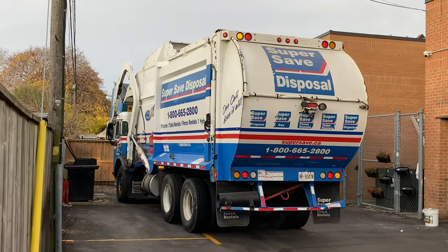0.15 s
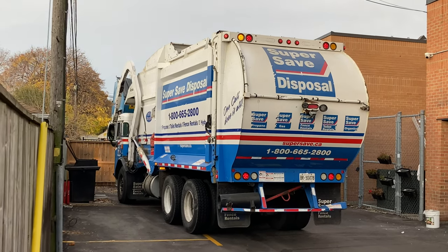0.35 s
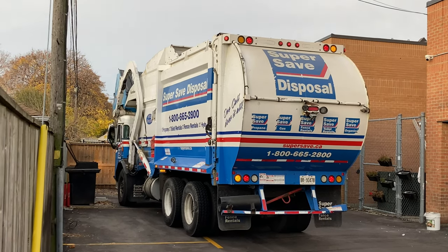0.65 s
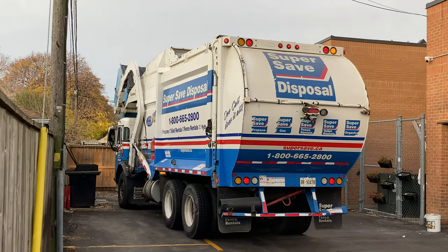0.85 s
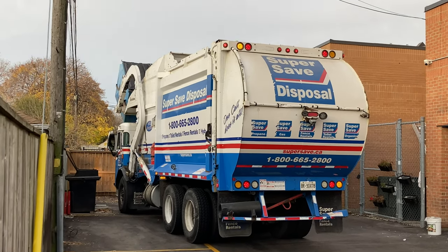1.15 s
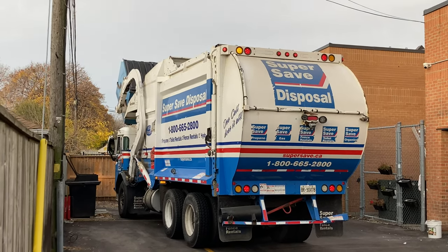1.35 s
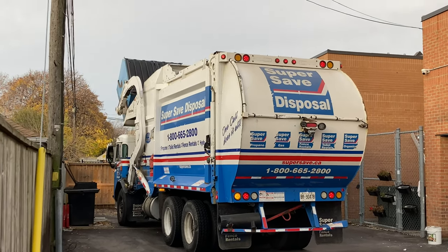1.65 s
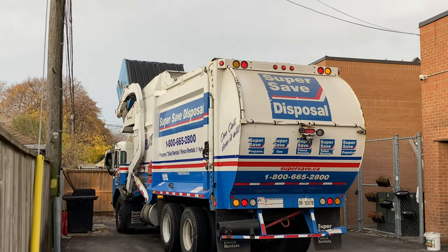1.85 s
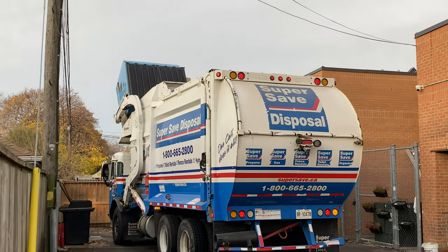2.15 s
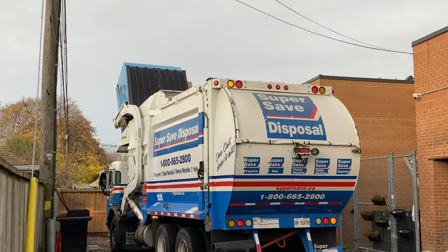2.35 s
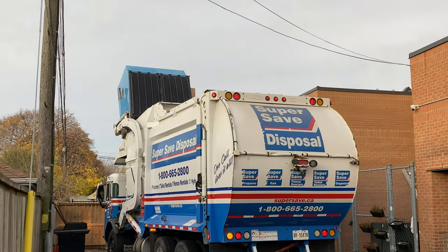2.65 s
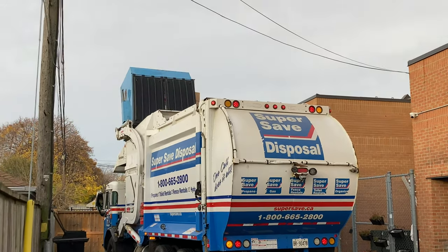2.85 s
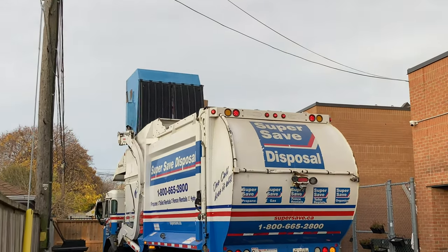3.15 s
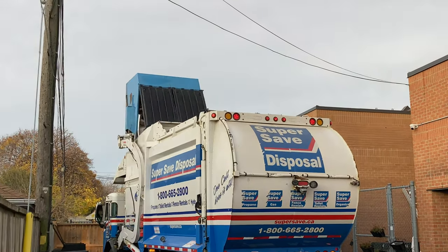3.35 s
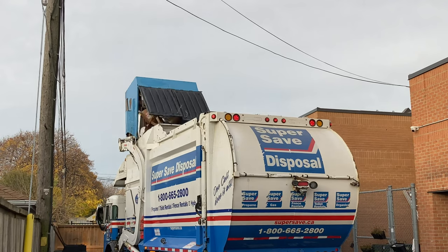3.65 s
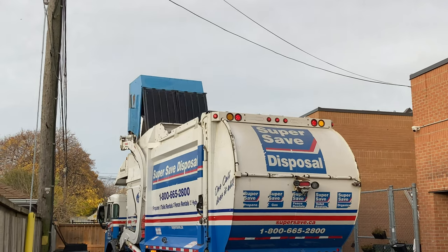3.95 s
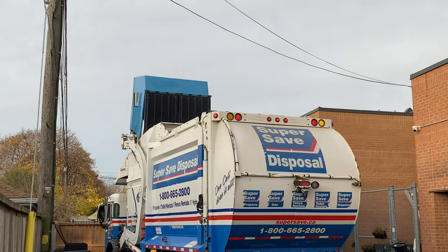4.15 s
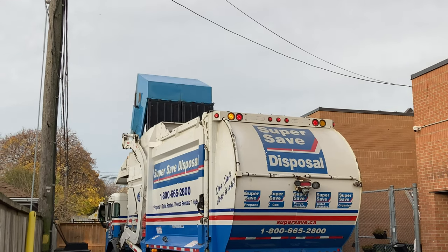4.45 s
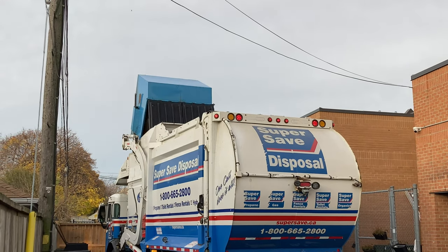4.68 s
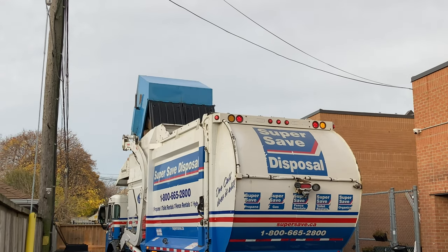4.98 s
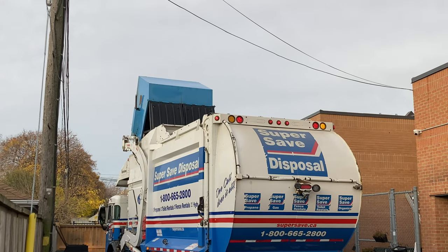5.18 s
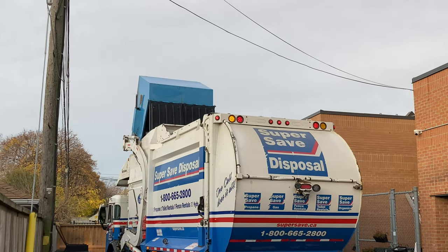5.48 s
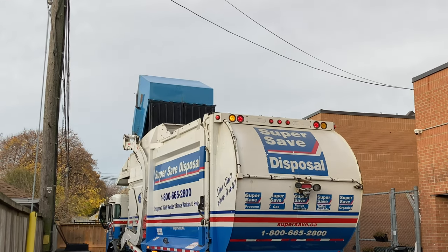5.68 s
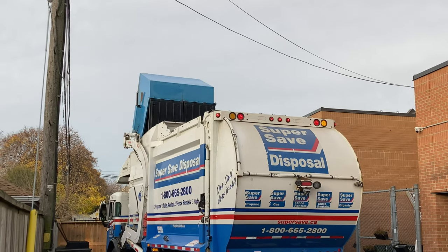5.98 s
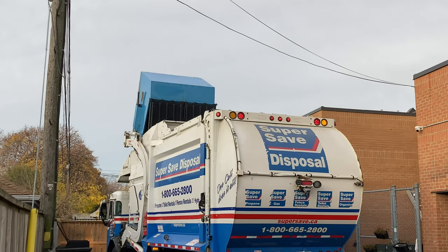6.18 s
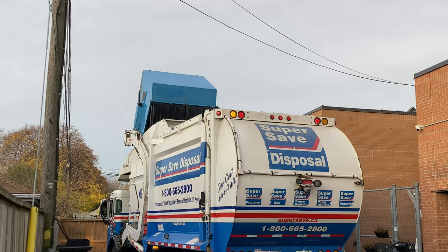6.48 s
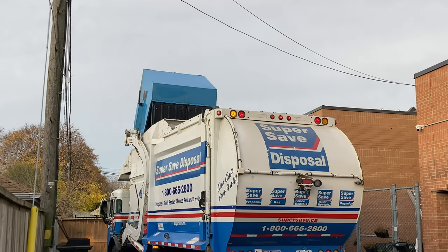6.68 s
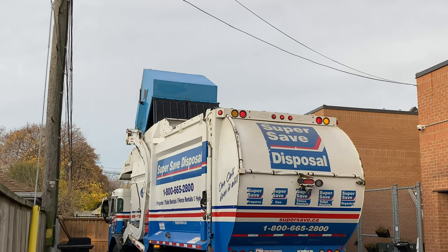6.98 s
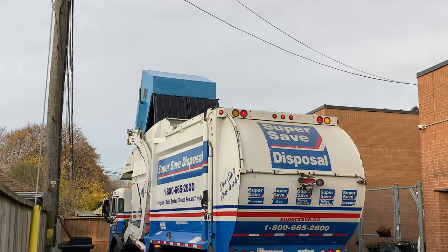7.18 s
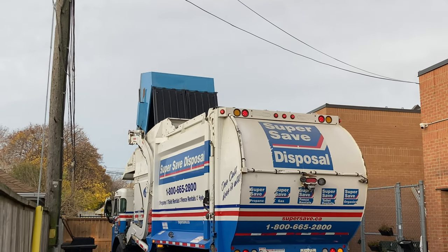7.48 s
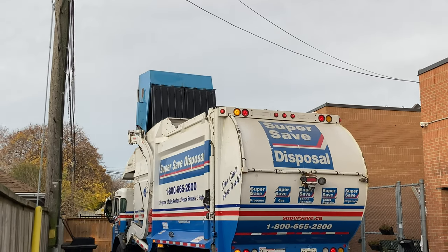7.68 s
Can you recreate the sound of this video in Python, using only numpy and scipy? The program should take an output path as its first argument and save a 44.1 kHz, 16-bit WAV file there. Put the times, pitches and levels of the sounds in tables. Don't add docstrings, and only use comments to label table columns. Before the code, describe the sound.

Outdoors, a refuse truck roars and whines while lifting a metal bin, hisses, drops to idle, and bangs the bin three times with rumbling echoes.

```python
import sys
import numpy as np
from scipy import signal
from scipy.fft import rfft, irfft, next_fast_len
from scipy.io import wavfile
from scipy.ndimage import uniform_filter1d

SR = 44100
rng = np.random.default_rng(int(sys.argv[2]) if len(sys.argv) > 2 else 0)


def store_pcm(level_fs):
    pcm = np.round(np.clip(level_fs, -1, 1) * 32767).astype(np.int16)
    wavfile.write(sys.argv[1], SR, np.atleast_2d(pcm).T)


N = 345303
SIZE = next_fast_len(N)
HZ = np.maximum(np.arange(SIZE // 2 + 1) * SR / SIZE, 1)
RELEASE_S, RELEASE_FADE_S = 2.975, 0.038


def from_db(db):
    return 10 ** (np.asarray(db) / 20)


def rms_one(x):
    return x / np.sqrt(np.mean(x ** 2) + 1e-20)


def ramp(start, length):
    return np.clip((np.arange(N) / SR - start) / length, 0, 1)


def in_time(rows, silent_db=None):
    s, *columns = np.transpose(rows)
    return [np.interp(np.arange(N) / SR, s, c, silent_db, silent_db) for c in columns]


def at_hz(points, outside=None):
    hz, value = np.transpose(points)
    return np.interp(np.log(HZ), np.log(np.maximum(hz, 1)), value, outside, outside)


def drift(rate):
    r = np.exp(-80 * np.pi * rate / SR)
    slow = signal.lfilter([1], [1, -2 * r, r * r], rng.standard_normal(N // 40 + 2002))[2000:]
    return np.interp(np.arange(N) / 40, np.arange(len(slow)), rms_one(slow))


def phase_of(hz):
    return 2 * np.pi * np.cumsum(hz) / SR


# (frequency [Hz], likeness [0-1])
LIKENESS = [(60, .985), (200, .975), (380, .82), (700, .68), (1400, .25), (2800, .4), (5200, .42),
            (6500, .5), (7500, .88), (9000, .95), (15000, .94)]


def field(gain):
    common, opposed = rfft(rng.standard_normal((2, SIZE))) * gain
    alike = np.clip(at_hz(LIKENESS), 0, 1)
    both = np.sqrt(1 + alike) * common + np.sqrt(1 - alike) * opposed * [[1], [-1]]
    return rms_one(irfft(both, SIZE)[:, :N])


def coloured(spectrum):
    return field(from_db(at_hz(spectrum, -102.5)))


# (time [s], pump pulse rate [Hz])
SPEED = [(0, 281), (.07, 292), (.15, 310), (.3, 329), (.45, 341), (.6, 349), (.8, 352), (.95, 352),
         (1.05, 349), (1.2, 342), (1.35, 337), (1.5, 334), (1.8, 331.5), (3.0, 331), (3.1, 326)]
# (time [s], firing rate [Hz])
IDLE_FIRING = [(3.1, 47), (3.6, 63), (7.83, 54)]


def firing_phase():
    pump_per_firing = 4.74
    laden = [(s, hz / pump_per_firing) for s, hz in SPEED[:-1]]
    firing = in_time(laden + list(IDLE_FIRING))[0]
    return phase_of(firing * (1 + 0.022 * drift(7.7)))


# (frequency [Hz], density [dB per Hz])
HISS = [(2300, 2.5), (2800, -2.5), (4500, -4), (6000, -9), (8500, -4.5), (11000, 0), (13500, -8),
        (15800, -9)]


def air_hiss(turn):
    return coloured(HISS) * (1 + .2 * np.cos(turn / 3)) * from_db(.5 * drift(3))


# (frequency [Hz], density [dB per Hz])
BLOCK = [(220, -27), (380, -11.5), (568, -4), (664, -2), (877, -8), (1090, -7), (1190, -12.5),
         (1440, -12.5), (1960, -17), (2250, -15), (2700, -23), (3510, -97), (5940, -120)]


def block_rattle(turn):
    return coloured(BLOCK) * (1 + 0.13 * np.cos(turn)) * from_db(0.88 * drift(23))


# (frequency [Hz], width [Hz], level [dB])
PANELS = [(151.2, 24, -25.5), (180.1, 6, -22.5), (238, 7.8, -26.5), (303, 6, -36.5)]


def body_panels():
    resonances = sum(from_db(db) / (1 + 2j * (HZ - hz) / width) for hz, width, db in PANELS)
    shaken = from_db(-1.0) * field(resonances)
    drum_db = -4.5 + 6.4 * drift(6.6) - 30 * ramp(RELEASE_S, RELEASE_FADE_S)
    drum = np.sin(phase_of(200.5 * (1 + 0.0092 * drift(4.0))))
    return shaken, from_db(drum_db) * drum


# (frequency [Hz], density [dB per Hz])
ROAR = [(19, -59.5), (32, -38.5), (46, -30), (60, -3), (76, -0.5), (107, -12), (140, -4.5), (189, -3),
        (285, -8), (339, -11.5), (385, -58), (420, -20.5), (550, -16), (920, -120)]


def exhaust_roar(turn, winding_down):
    puffs = coloured(ROAR) * (1 + 0.35 * np.cos(turn)) * from_db(0.27 * drift(1.7))
    tone_db = -24.0 - 9.0 * winding_down + 2.1 * drift(3.0)
    return puffs + from_db(tone_db) * np.sin(turn)


# (time [s], level [dB])
EFFORT = [(0, -16.5), (.05, -14), (.31, -13), (.66, -11), (1.15, -11.5), (2.5, -13), (2.88, -11.5),
          (3.0, -19.5), (3.15, -13), (3.4, -32), (3.6, -28), (4.2, -21), (5.3, -39.5), (5.8, -34),
          (6.3, -34), (7.2, -35.5), (7.83, -32.5)]


def engine():
    roar_db, = in_time(EFFORT)
    swing = roar_db + 14
    winding_down = ramp(3.45, 1.84)
    block_db = -25 + 0.27 * swing - 11.5 * winding_down
    hiss_db = -33 + 0.92 * swing - 3 * ramp(5.1, .3) + 5 * ramp(TICK[0][0], 0.029)
    turn = firing_phase()
    shaken, drum = body_panels()
    roar = exhaust_roar(turn, winding_down) + shaken + drum
    block = from_db(block_db + 1.0) * block_rattle(turn)
    return from_db(roar_db - 3.5) * roar + block + from_db(hiss_db) * air_hiss(turn)


# (time [s], frequency [Hz], level [dB])
MESH = [(0, 1065, -55), (.17, 995, -32), (.24, 1040, -38), (.33, 1075, -32.5), (.42, 1100, -34),
        (.45, 1112, -28.5), (.56, 1128, -34), (.62, 1138, -35.5), (1.07, 1135, -42), (1.12, 1124, -33),
        (1.31, 1104, -26), (1.37, 1100, -35), (1.87, 1083, -41), (1.92, 1082, -30), (2.46, 1081, -29),
        (2.53, 1081, -44), (2.6, 1081, -33.5), (2.98, 1080, -26)]
# (time [s], level [dB])
PRESSURE = [(0, -38), (.3, -33), (.6, -30), (.75, -31.5), (.95, -35), (1.08, -24), (1.25, -32), (1.4, -38),
            (1.52, -29), (1.75, -26), (2.08, -26.5), (2.17, -31), (2.3, -33), (2.45, -34), (2.7, -31),
            (3.0, -27)]
# (time [s], level [dB])
PUMP = [(0, -31), (.12, -22.5), (.25, -35), (.55, -23.5), (.8, -33.5), (1.08, -27), (1.35, -31), (1.6, -34),
        (2.2, -36), (2.4, -30.5), (3.0, -30)]
# (time [s], level [dB])
HIGH_GEAR = [(0, -43), (.08, -38), (.2, -47), (.33, -40), (.42, -45), (.52, -45), (.68, -33.5),
             (.78, -36.5), (.86, -50), (.98, -42), (1.06, -31.5), (1.13, -49), (2.2, -50), (2.4, -41.5),
             (2.62, -44), (2.7, -48), (3.0, -50)]


def whines():
    turn = phase_of(in_time(SPEED)[0] * (1 + .002 * drift(14)))
    mesh_hz, mesh_db = in_time(MESH)
    mesh = phase_of(mesh_hz * (1 + .0015 * drift(14)))
    high = 6.81 * turn
    high_db, = in_time(HIGH_GEAR)
    octave_db = high_db - 18 + 15 * ramp(1.03, 0.09)
    tones = [(turn, in_time(PUMP)[0], 3.5, 0),
             (2 * turn, in_time(PRESSURE)[0], 2.5, 0),
             (mesh, mesh_db, 1.0, 0.53),
             (high, high_db, 2.5, 0),
             (2 * high, octave_db, 3, -1.0),
             (2 * mesh, mesh_db - 14.5, 3.0, 0),
             (4 * mesh, mesh_db - 19.0, 3.0, 0)]
    out = np.zeros((2, N))
    for phase, level_db, waver_db, lead in tones:
        waver = drift(16) + np.array([drift(14), drift(14)]) / 2
        out += from_db(level_db + 3 + waver_db * waver) * np.sin(phase + lead * np.array([[1], [-1]]))
    released = ramp(RELEASE_S, RELEASE_FADE_S)
    return out * from_db(-36 * released) * (released < 1)


# (time [s], level [dB])
VALVE = [
    (2.935, -34),
    (2.951, -12.5),
    (2.963, -7),
    (3.073, -22.5),
    (3.14, -29),
]
# (frequency [Hz], density [dB per Hz])
JET = [(1200, -25), (1800, -9), (2300, -1.5), (3000, -10), (4200, -3), (5500, -4), (7500, -4.5),
       (10000, 1.5), (13000, -5.5), (15800, -6)]


def valve():
    return from_db(in_time(VALVE, -120)[0] + 1.8 * drift(60)) * coloured(JET)


# (time [s], frequency [Hz], level [dB])
HINGE = [(3.2, 2150, -60), (3.24, 2200, -33), (3.3, 2120, -37), (3.36, 2230, -35), (3.42, 2200, -34),
         (3.48, 2250, -32), (3.53, 2200, -60)]


def hinge():
    hz, level_db = in_time(HINGE)
    turn = phase_of(hz * (1 + .02 * drift(30)))
    sounding = ramp(HINGE[0][0], .01) - ramp(HINGE[-1][0], .01)
    return sounding * from_db(level_db + 4 * np.array([drift(40), drift(40)])) * np.sin(turn)


# (time [s], light refuse level [dB], heavy pieces level [dB])
SLIDE = [(3.19, -20, -17), (3.376, -22.5, -17.5), (3.41, -25.5, -25), (3.5, -29.5, -32), (3.9, -30.5, -21),
         (3.97, -29, -25.5), (4.02, -36.5, -30), (4.13, -45, -29), (4.25, -43, -22)]
# (frequency [Hz], density [dB per Hz])
RUSTLE = [(2600, -4), (3500, -5), (5000, -4), (7000, -0.5), (8500, -1), (10000, -3)]


def load():
    rustle_db, tumble_db = in_time(SLIDE, -120)
    fizz_db = rustle_db - 0.5 - 9 * ramp(3.4, 0.16)
    scrape_db = -1.5 + 0.23 * rustle_db + 0.77 * tumble_db
    clumps = from_db(1.3 * drift(22))
    fizz = coloured([(8500, -25), (9500, 6), (12800, -3.0), (13400, -3)])
    scrape = field(1 / (1 + (2 * (HZ - 2120) / 600) ** 2))
    tumble = field(1 / (1 + (2 * (HZ - 400) / 450) ** 2)) * from_db(2.8 * drift(9.5))
    bright = from_db(rustle_db) * coloured(RUSTLE)
    bright = bright + from_db(fizz_db) * fizz + from_db(scrape_db - 7.0) * scrape
    return clumps * bright + from_db(tumble_db - 8.5) * tumble


# (time [s], boom [dB], clang [dB], bright crack [dB], sizzle of shaken grit [dB])
SLAMS = [
    (3.161, -24.5, -25.5, -9, -43),
    (4.253, -20.5, -24.5, -19, -21.5),
    (6.363, -18.5, -27.5, -38, -34),
]
# (time [s], boom [dB], clang [dB], length [s])
GRINDS = [
    (4.154, -33.5, -30.5, 0.21),
    (4.296, -20, -19.5, 0.13),
    (6.366, -25.5, -28.5, 0.062),
    (6.476, -29, -28.5, 0.17),
]
# (time [s], boom [dB], dry knock [dB],
# knock pitch [Hz])
KNOCKS = [(3.12, -23.5, -18, 365), (3.169, -33, -8, 480), (3.186, -38, -29, 400), (3.19, -43, -25, 3500),
          (3.236, -45, -17, 1500), (3.3, -25.5, -23, 900), (3.372, -35, -28, 340),
          (3.168, -48, -11.5, 2960), (3.175, -26.5, -16, 560), (3.18, -45, -28, 1000),
          (3.212, -53, -20, 700), (3.26, -45, -19.5, 915), (3.243, -38, -20, 2200),
          (4.019, -33.5, -15, 265), (4.266, -21, -10.5, 297), (4.359, -28, -19, 500),
          (4.409, -25.5, -14, 450), (4.405, -32, -17, 2290), (4.431, -41, -21, 2870),
          (4.32, -49, -35, 5500), (4.37, -47, -28, 4000), (4.113, -49, -26, 516), (4.145, -35.5, -40, 410),
          (4.279, -43, -16, 890), (4.331, -37, -19, 356), (4.381, -41, -11.5, 290),
          (4.466, -49, -24, 1210), (4.482, -42, -17, 298), (4.509, -41, -24, 2200), (4.535, -46, -19, 320),
          (4.556, -43, -29, 400), (4.441, -50, -26, 444), (4.721, -35, -20.5, 500), (4.767, -28, -27, 300),
          (4.813, -41, -27, 408), (4.913, -34, -31, 557), (5.001, -38, -26, 302), (5.027, -33, -26, 500),
          (5.473, -48, -35.5, 690), (4.11, -55, -36, 15000), (4.15, -55, -32, 13000),
          (4.184, -30, -24.5, 11500), (6.366, -48, -30, 4500), (6.377, -45, -16, 1300),
          (6.415, -47, -17.5, 880), (6.44, -39, -31, 4600), (6.473, -38.5, -15.5, 298),
          (6.52, -37, -18, 320), (6.575, -42, -18, 280), (6.645, -32.5, -21, 304), (6.37, -42, -19, 150),
          (6.392, -49, -13.5, 500), (6.409, -27.5, -13, 288), (6.414, -42, -20, 453),
          (6.941, -40, -38, 2510),
          (2.945, -37, -8, 190), (2.962, -44, -35, 350), (2.985, -43, -20, 148), (3.156, -55, -25, 6500),
         (3.165, -41, -16, 950), (4.3, -45, -27, 1600), (4.345, -51, -28, 2600), (4.418, -27, -16, 1240),
         (6.358, -55, -32, 4500), (6.49, -53, -26, 2000), (6.56, -45, -27, 2000), (6.701, -51, -33, 249),
         (3.864, -47, -20.5, 150), (4.056, -33, -23, 200), (4.08, -46, -23, 199), (4.11, -50, -17, 200),
         (4.14, -37, -26, 150), (4.174, -48, -18, 328), (4.299, -49, -17, 330), (4.442, -45, -16, 277),
         (3.186, -60, -18, 7500), (4.271, -26.5, -15, 131), (4.262, -38, -24, 3000),
         (6.385, -31, -16.5, 243), (6.431, -48, -24, 251), (1.903, -41, -27, 990), (6.447, -43, -30, 900),
         (6.661, -53, -34, 700), (6.69, -35, -20, 111), (6.86, -35, -25, 150), (6.95, -47, -28, 230),
         (7.29, -45, -25, 130)]
# (time [s], dry knock [dB], knock pitch [Hz])
TICK = [
    (5.2, -40, 4860),
    (6.004, -32, 1310),
    (6.017, -30, 1481),
    (6.008, -32, 700),
    (6.02, -35, 600),
    (6.025, -27, 270),
    (6.03, -40, 3241),
]


def contacts():
    rows = []
    for s, boom_db, knock_db, hz in KNOCKS:
        rows.append((s, boom_db, boom_db - 9.5, 0.015 * (500 / hz) ** 0.1, knock_db, hz))
    for s, boom_db, clang_db, length in GRINDS:
        rows.append((s, boom_db, clang_db, length, boom_db - 13, 348))
    for s, knock_db, hz in TICK:
        rows.append((s, -56, -58, 0.016, knock_db, hz))
    for s, boom_db, clang_db, crack_db, sizzle_db in SLAMS:
        rows.append((s, boom_db, clang_db, 0.018, -17.5, 825))
        rows.append((s + 0.0061, -90, -90, 0.012, crack_db, 9400))
        rows.append((s + 0.0071, -90, -90, 0.16, sizzle_db, 13000))
    return rows


def dry_knock(crunch, t, contact, knock_hz):
    throat = signal.iirpeak(knock_hz, 1.8, SR)
    knock = signal.lfilter(*throat, signal.lfilter(*throat, crunch))
    power = uniform_filter1d(np.sum(knock ** 2, axis=0), size=int(SR / knock_hz) + 40)
    knock = knock / (power + 1e-9) ** .35
    knock = knock * np.exp(-t / contact) ** 0.73 * np.minimum(t / (contact / 4), 1)
    return rms_one(knock) * np.sqrt(contact * SR / len(t))


# (frequency [Hz], density [dB per Hz])
HOPPER = [(25, -28), (58, -7.5), (85, -7), (150, -1), (190, -6.5), (242, -2.5), (323, 1.5), (382, -8.5),
          (475, -1), (770, -9.5), (1130, -14.5), (1260, -20.5), (1700, -22.5), (2050, -22.5), (2500, -29),
          (3200, -33), (4480, -29), (5800, -31.5), (8000, -39), (12000, -41.5), (16000, -41)]
# (frequency [Hz], first t60 [s], late t60 [s], late share [dB])
RINGING = [(50.56, 0.54, 10.4, 3.5), (114, 0.44, 4.25, 1), (239, 0.17, 3.97, 0), (500, 0.39, 2.9, -16),
           (1070, 0.31, 2.82, -2.5), (2620, 0.05, 2.34, -9.5), (5170, 0.045, 2.04, -8.5),
           (9500, 0.084, 2.38, -8)]


def steel_box(boom, clang):
    t = np.arange(2 * SR + SR // 2) / SR
    body = rfft(coloured(HOPPER), SIZE)
    answers = np.zeros((2, 2, len(t)))
    centres = np.log(np.array(RINGING)[:, 0])
    for k, (hz, first, late, late_db) in enumerate(RINGING):
        share = np.interp(np.log(HZ), centres, np.arange(len(centres)) == k)
        dying = from_db(-60 * t / first) + from_db(late_db - 60 * t / late)
        swell = 1 - np.exp(-t * hz / 0.21)
        answers[int(hz > 1500)] += irfft(body * share, SIZE)[:, :len(t)] * dying * swell
    out = np.zeros((2, N + SR))
    for answer, drive in zip(answers, [boom, clang]):
        out += signal.fftconvolve(answer, [drive], axes=1)[:, :N + SR]
    return out


# (frequency [Hz], level [dB], t60 [s])
PLATES = [(243.4, 9, 0.54), (320, 8, 0.53), (482, -1.5, 0.84), (790, 0, 0.19), (1090, 0, 0.35)]
# (frequency [Hz], level [dB], t60 [s])
WALLS = [(1914, -3, 0.65), (2200, -1, 0.57), (2950, 2, .4), (4100, -12, .4), (4480, 1, 1), (4750, -1, 0.75),
         (5830, 0, 0.47)]


def plate_modes(boom, clang):
    out = np.zeros(N + SR)
    for hz, db, t60 in PLATES + [(hz, db - 16.5, t60) for hz, db, t60 in WALLS]:
        drive = boom if hz < 1500 else clang
        r = from_db(-60 / (min(t60, 1.2) * SR))
        for off in rng.uniform(-1.1, 1, 3):
            mode_hz = hz * (1 + .03 * off)
            w = 2 * np.pi * mode_hz / SR
            mode_drive = drive if (mode_hz < 1500) == (hz < 1500) else (boom if mode_hz < 1500 else clang)
            ring = signal.lfilter([0, np.sin(w)], [1, -2 * r * np.cos(w), r * r], mode_drive + 1e-18)
            out += from_db(db - 6 - 15.0) * ring
    return out


def blows():
    t = np.arange(SR) / SR
    out = np.zeros((2, N + SR))
    jolts = rng.standard_normal(N + SR) * (rng.random(N + SR) < 1500 / SR)
    crunch = field(1 / np.hypot(1, HZ / 5000)) * from_db(2.4 * drift(71))
    crunch = np.pad(crunch, ((0, 0), (0, SR)))
    boom, clang = np.zeros(N + SR), np.zeros(N + SR)
    for s, boom_db, clang_db, contact, knock_db, knock_hz in contacts():
        heard = min(SR, int(contact * SR) * 8)
        span = slice(round(s * SR), round(s * SR) + heard)
        push = jolts[span] * np.exp(-t[:heard] / contact)
        push = push / np.sqrt(np.sum(push ** 2) + 1e-20)
        boom[span] += from_db(boom_db) * push
        clang[span] += from_db(clang_db + 23.0) * push
        out[:, span] += from_db(knock_db - 1.0) * dry_knock(crunch[:, span], t[:heard], contact, knock_hz)
    out += steel_box(boom, clang) + plate_modes(boom, clang)
    return out[:, :N]


def scene():
    return engine() + whines() + valve() + hinge() + load() + blows()


# (frequency [Hz], left lead [rad])
LEAD = [(0, 0), (300, .14), (860, .4), (1900, -.6), (3100, 2.5), (5600, 2.3), (6600, .6), (7200, 0),
        (9180, -3.14), (11350, -6.28), (13750, -9.42), (15700, -12.57), (22050, -20)]
# (frequency [Hz], left minus right [dB])
TILT = [(60, -2.5), (110, -1), (200, -0.7), (380, 2.5), (700, 0.5), (1290, 2.5), (2380, 1.9), (4400, 0.5),
        (8120, -1), (15000, 1.5)]
# (frequency
# [Hz], level [dB])
HOUSING = [(22, -38), (45, -2.5), (1100, 0), (1300, -3.5), (1750, -4.5), (2200, -4.5), (2550, -6),
           (2900, -2), (3700, -2), (4500, -1.5), (5300, -3), (6300, -3), (15800, -11), (15870, -60),
           (16300, -90)]


def microphone_ports(dry):
    hz, lead = np.transpose(LEAD)
    skew = np.exp(.5j * np.interp(HZ, hz, lead)) * from_db(at_hz(TILT) / 2)
    rounded = 1.05 * np.tanh(dry / 1.05)
    spectrum = rfft(rounded, SIZE) * from_db(at_hz(HOUSING))
    return irfft(spectrum * [skew, 1 / skew], SIZE)[:, :N]


def band_limit(x):
    return signal.sosfilt(signal.butter(12, 17100, fs=SR, output="sos"), x)


def record(dry):
    mix = microphone_ports(dry)
    return band_limit(mix)


dry = scene()
out = record(dry)
store_pcm(out)
```